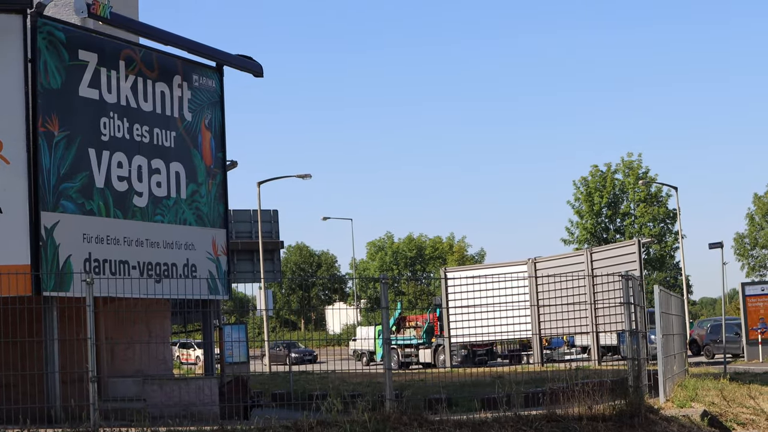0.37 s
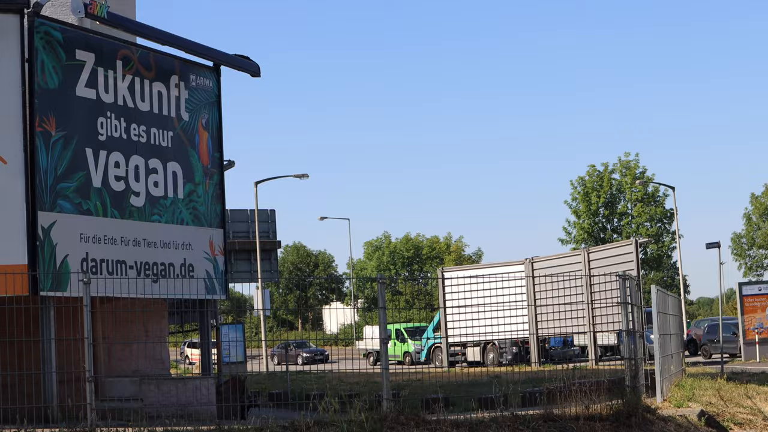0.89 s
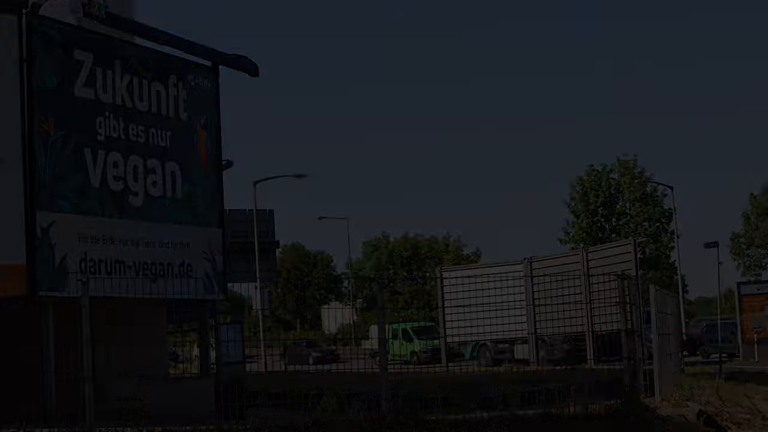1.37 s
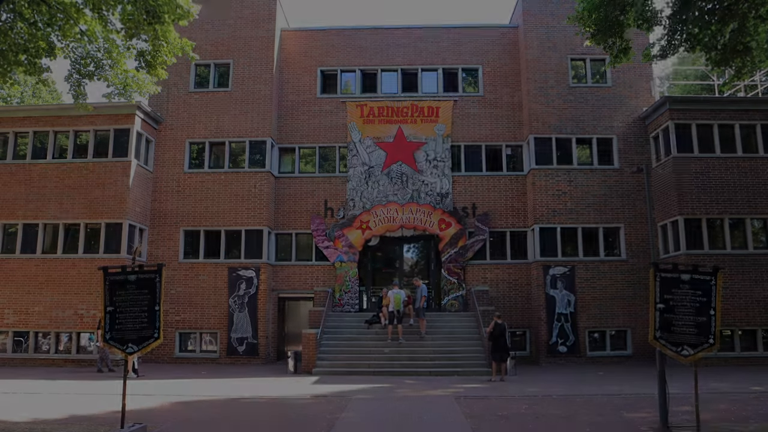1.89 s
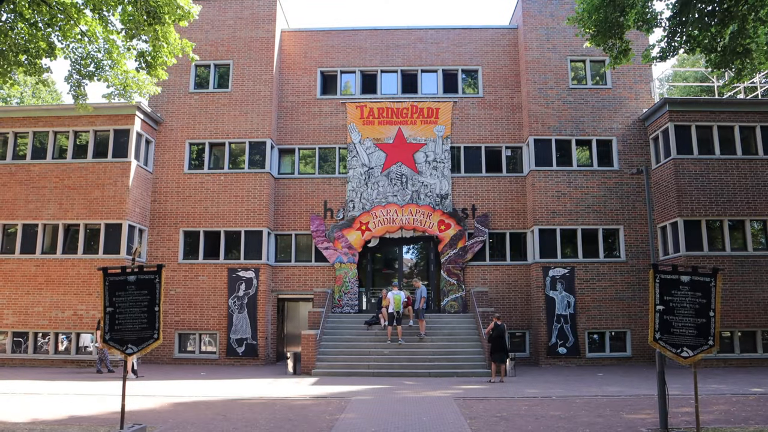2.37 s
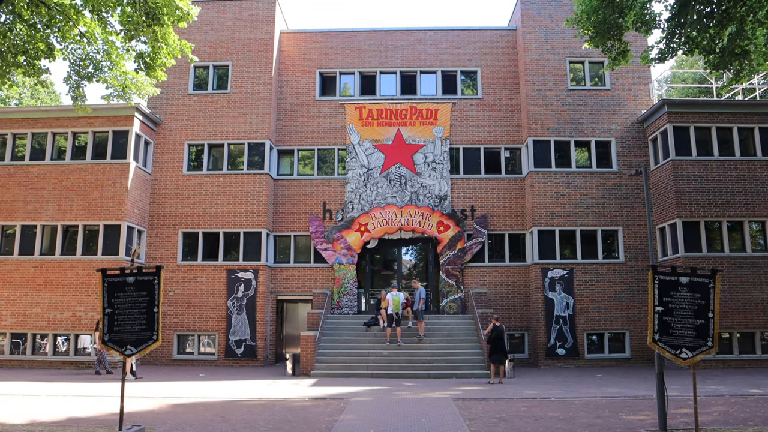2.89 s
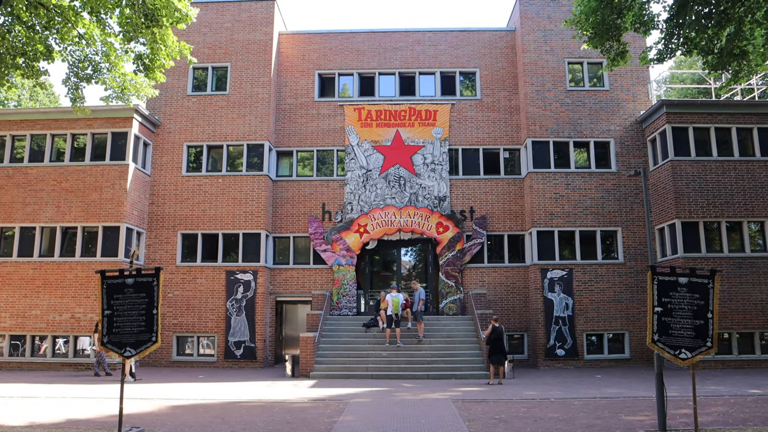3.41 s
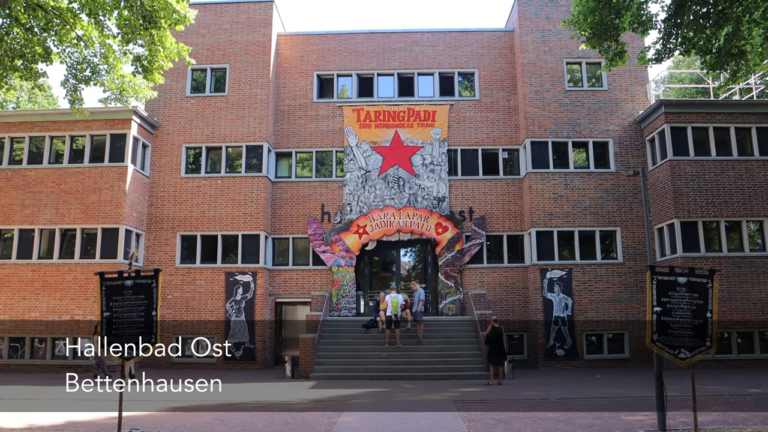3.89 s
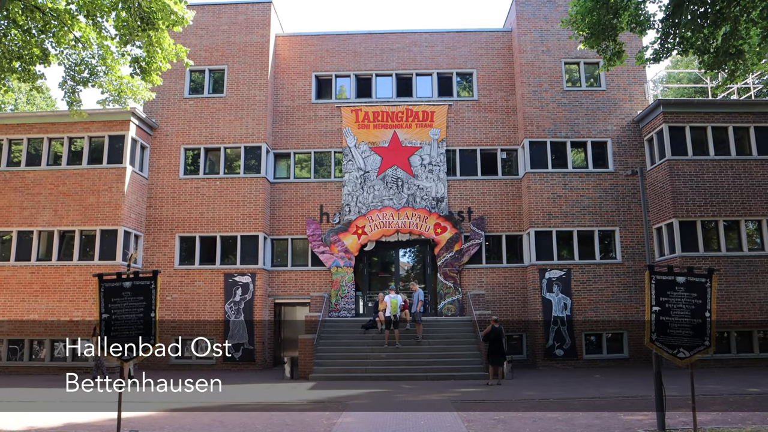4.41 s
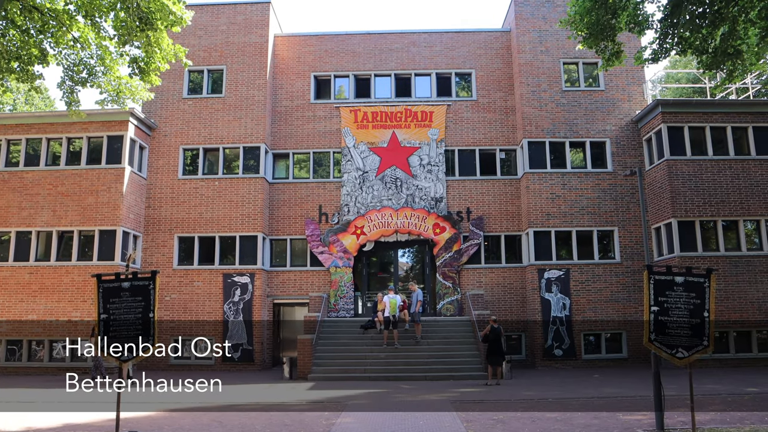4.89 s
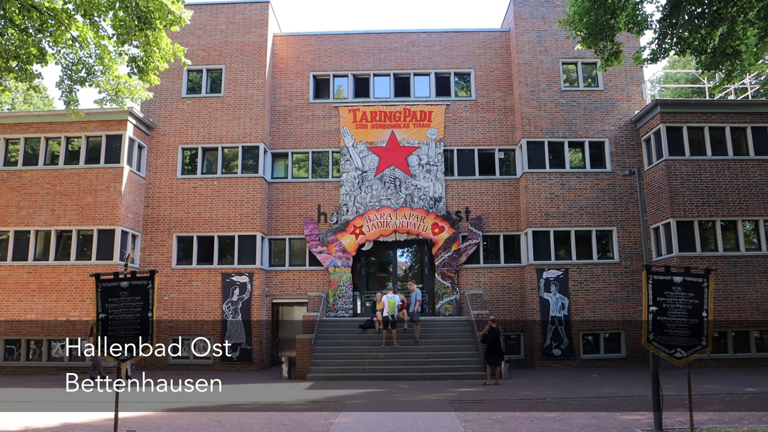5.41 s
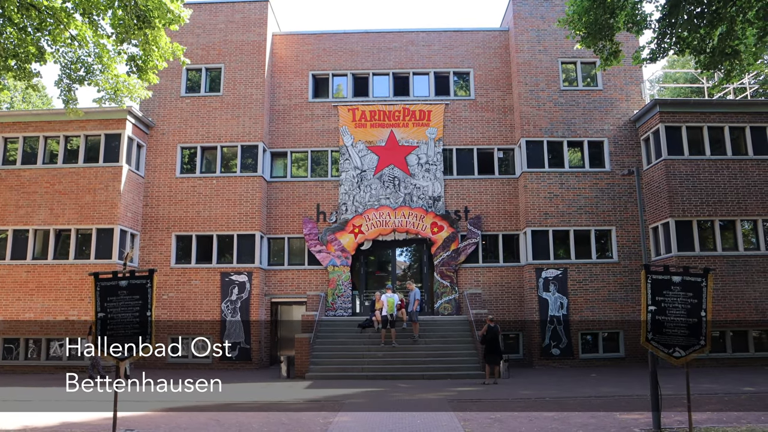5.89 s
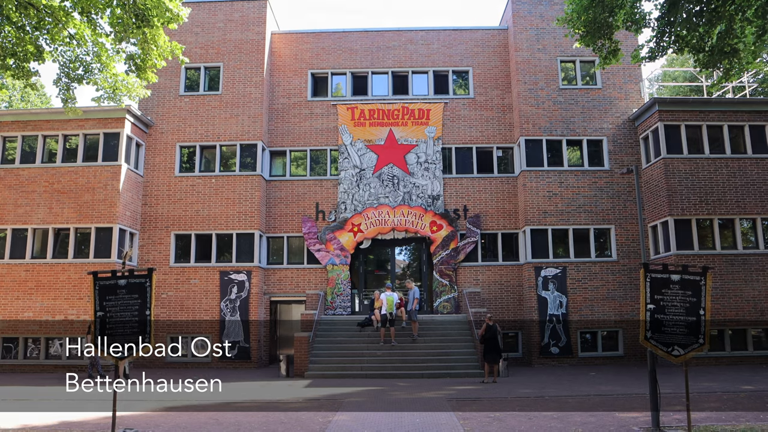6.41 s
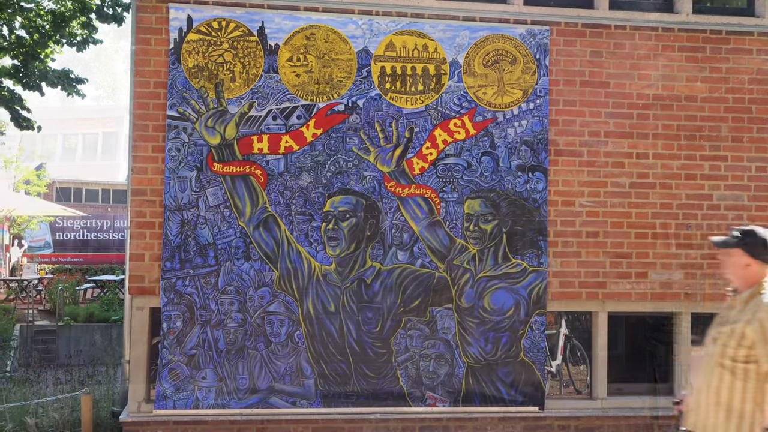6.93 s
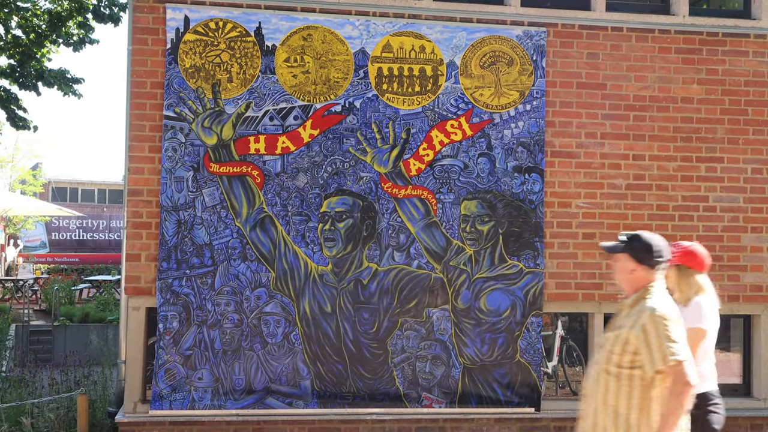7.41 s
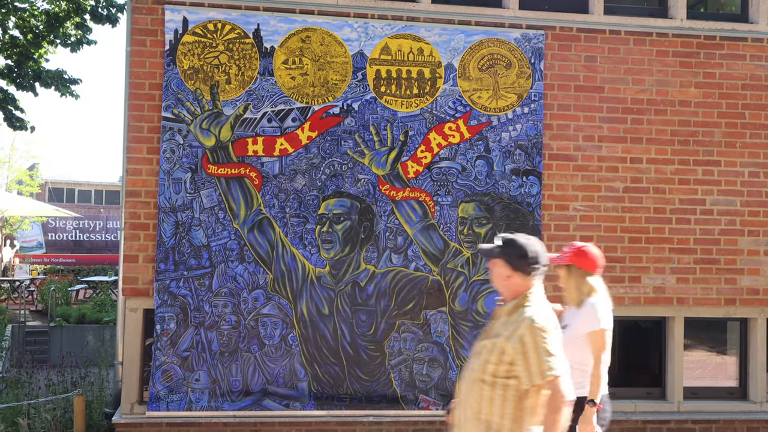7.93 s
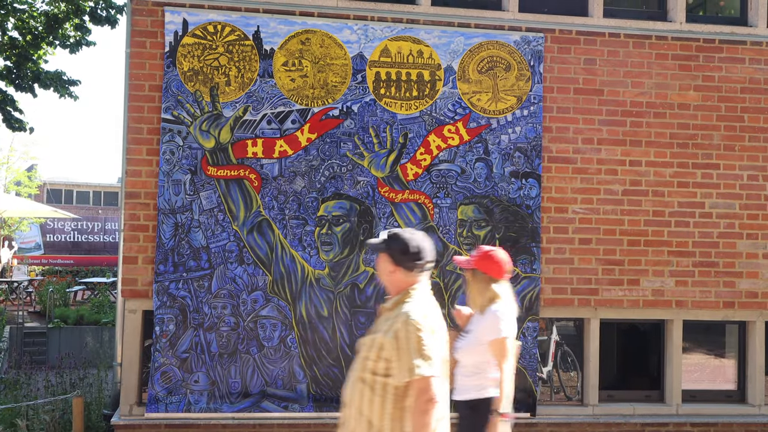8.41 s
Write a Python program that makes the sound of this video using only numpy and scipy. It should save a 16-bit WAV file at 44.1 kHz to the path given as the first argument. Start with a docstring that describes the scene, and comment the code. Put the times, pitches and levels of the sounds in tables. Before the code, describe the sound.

Outdoors, a small stereo camera hears dense traffic roaring on a busy road, a lorry's low drone wavering past slightly to the right. After about a second and a half it fades into a quieter square, where soft traffic rumble carries a deep, uneven diesel throb. Near the end it blends into a street corner with fuller traffic hum, a small click and faint buzzy bird trills on the right.

```python
"""Road traffic, the blurred roar and hiss of many vehicles, in three outdoor places joined by cross-fades.
A busy road with a lorry comes first, then a square with a deep engine throb, then a street corner with a bird.
The traffic is noise shaped in pitch and level; the engines, whines, trills and ticks are sines with moving
pitch or level. A small camera hears it all through two close microphone ports, left and right."""
import sys
import numpy as np
from scipy import signal
from scipy.fft import rfft, irfft, next_fast_len
from scipy.io import wavfile
from scipy.ndimage import uniform_filter1d

SR = 44100
rng = np.random.default_rng(int(sys.argv[2]) if len(sys.argv) > 2 else 0)


def int16_out(signal):
    """Quantize to a 16-bit WAV file."""
    q = np.round(np.clip(np.atleast_2d(signal).T, -1, 1) * 32767)
    wavfile.write(sys.argv[1], SR, q.astype(np.int16))


def voltage_ratio(decibels):
    """Convert decibels (scalar or array-like) to amplitude ratios, 20 dB per decade."""
    exponent = np.asarray(decibels, float) / 20
    return 10 ** exponent


N = 376610  # length in samples
SECONDS = np.arange(N) / SR


def on_log(hz, table):
    """Read a (pitch_hz, value) table, with pitch on a log scale as the ear hears it."""
    points, values = np.transpose(table)
    return np.interp(np.log(np.maximum(hz, 1)), np.log(points), values)


def walk(rate, size):
    """Random wandering: levels held for 1 / rate seconds, smoothed twice, with a spread near 1."""
    hold = int(SR / rate)
    steps = np.repeat(rng.standard_normal(size // hold + 1), hold)
    smooth = uniform_filter1d(uniform_filter1d(steps, hold), hold)
    return 1.29 * smooth[:size]


def gate(start, end, edge):
    """A window in time that opens and closes softly."""
    from_edge = np.minimum(SECONDS - start, end - SECONDS)
    return np.sin(np.pi / 2 * np.clip(from_edge / edge + .5, 0, 1)) ** 2


def note(hz, drift, waver_db, rate):
    """A sine of rms 1, before its level wavers; its pitch wanders too."""
    phase = 2 * np.pi * np.cumsum(hz * (1 + drift * walk(rate, N))) / SR
    level = np.sqrt(2) * voltage_ratio(waver_db * walk(rate, N))
    return level * np.sin(phase + 2 * np.pi * rng.random())


def bump(t, peak_s, length_s):
    """A smooth rise and fall over time, 1 at its peak."""
    return np.exp(-(2 * (t - peak_s) / length_s) ** 2)


def left_right(mid, side):
    """Two ports from their shared sound (mid) and their difference (side)."""
    return np.array([mid + side, mid - side])


# colour of the traffic in each place: pitch_hz, relative level_db per Hz
ROAD_COLOUR = [(20, -35.5), (40, -18.5), (85, -2.5), (170, -1.5), (270, 0), (400, -5), (600, -9.5),
               (900, -11), (1900, -22), (3400, -31.5), (4600, -40), (6500, -52.5), (9000, -73),
               (12500, -84), (15000, -108)]
SQUARE_COLOUR = [(15, -23), (28, -7.5), (60, -1.5), (170, -9), (280, -12.5), (420, -17.5), (830, -20.5),
                 (1800, -28.5), (3300, -40.5), (4600, -50.5), (6500, -62.5), (9000, -68.5), (12500, -80),
                 (15000, -109)]
CORNER_COLOUR = [(20, -33.5), (45, -14), (110, -.5), (235, -3.5), (350, -6), (520, -10), (950, -10),
                 (1900, -17.5), (3400, -27), (4900, -39.5), (6100, -45), (7000, -56), (9000, -75),
                 (12500, -94), (15000, -119)]
# each place, one row: level_db before its changes, extra_width_db, lean_right (share, minus = left),
# left_late (share, minus = right port late), nearer_db_per_s (minus = moving away)
ROAD_SETTING = (-22.5, -1.5, 0.65, 0.19, -1.5)
SQUARE_SETTING = (-28.5, 0.5, -0.17, -0.4, -0.4)
CORNER_SETTING = (-28, -.5, 0.35, 0.47, 0)
# close ports hear the bass alike and the treble opposed: pitch_hz, side_minus_mid_db
PORT_WIDTH = [(30, -42), (100, -28), (250, -18), (630, -8), (1600, -1), (4100, 5.5), (6500, 8), (9000, 7),
              (14000, 4)]
# brief swells and dips of the traffic roar around a centre pitch:
# peak_s, length_s, change_db (minus = dip), centre_hz
ROAR_SWELLS = [(.0, 0.25, 3, 3020), (0.798, .15, 2, 4000), (0.887, 0.38, 2.5, 900), (1.5, 0.28, 2.5, 600),
               (1.89, .4, 2, 302), (3.5, 1, 1, 4200), (4.15, 0.5, 2.5, 169), (5.85, 0.74, -0.7, 170),
               (7.6, 0.7, 0.5, 6000)]
# the roar's upper bands jump briefly, one row: peak_s, length_s, rise_db
ROAR_JUMP = (.243, .07, 5.5)


def traffic(start, end, colour, place, flicker_db):
    """Many vehicles blur into noise; its octave bands share slow drift but flicker apart."""
    level_db, width_db, lean, late, nearer_db = place
    first, size = int(start * SR), next_fast_len(int((end - start) * SR))
    hz = np.arange(size // 2 + 1) * SR / size
    mid, other = rfft(rng.standard_normal((2, size)))

    # traffic off to one side ties the difference to the sum: weaker and later at the far port
    tie = -(lean / np.sqrt(1 + (hz / 2200) ** 2) + 1j * late)
    side = tie * mid + np.sqrt(np.maximum(1 - abs(tie) ** 2, 0)) * other
    side = side * voltage_ratio(on_log(hz, PORT_WIDTH) + width_db)
    pair = np.array([mid, side]) * voltage_ratio(on_log(hz, colour))
    pair = pair * voltage_ratio(level_db) / np.std(irfft(pair[0], size))

    t = (first + np.arange(size)) / SR
    approach = nearer_db * (t - (start + end) / 2)
    swells = [(change_db * bump(t, peak_s, length_s), centre_hz)
              for peak_s, length_s, change_db, centre_hz in ROAR_SWELLS]
    peak_s, length_s, rise_db = ROAR_JUMP
    jump = rise_db * bump(t, peak_s, length_s)
    spread_octaves = 1.6  # how far a swell or dip reaches around its centre pitch
    bands = 0
    for band_hz in 170 * 2. ** np.arange(-3, 8):
        # neighbouring bands overlap as triangles one octave to each side
        share = np.clip(1 - np.abs(np.log2(np.maximum(hz, 1) / band_hz)), 0, 1)
        swelling = sum(swell * np.exp(-(np.log2(band_hz / centre_hz) / spread_octaves) ** 2)
                       for swell, centre_hz in swells)
        change_db = approach + swelling + jump * (band_hz > 300) + flicker_db * walk(6, size)
        bands = bands + voltage_ratio(change_db) * irfft(pair * share, size)
    out = np.zeros((2, N + size))
    out[:, first:first + size] = left_right(*bands)
    return out[:, :N]


# lorry drone by the road, before it wavers: time_s, pitch_hz, level_db
LORRY_DRONE = [(0, 279, -29), (.2, 272, -45), (.35, 262, -43), (.47, 260, -27.5), (.7, 258, -36.5),
               (.8, 265, -34), (1.15, 265, -28.5), (1.55, 264, -33)]


def lorry():
    """The exhaust of a lorry pulling past: one note that glides and wavers, slightly to the right."""
    time_s, pitch_hz, level_db = np.transpose(LORRY_DRONE)
    tone = note(np.interp(SECONDS, time_s, pitch_hz), drift=.014, waver_db=3.5, rate=16)
    tone = voltage_ratio(np.interp(SECONDS, time_s, level_db)) * tone
    return left_right(tone, -.07 * tone)


# heavy engine across the square, before it wavers: time_s, firing_hz, level_db
ENGINE_THROB = [(1.5, 52.15, -40), (1.72, 48.3, -26), (1.88, 50, -39), (2.04, 57.41, -29), (2.2, 47.8, -47),
                (2.46, 48.16, -26.5), (2.6, 52.76, -31), (2.87, 54.44, -29), (3.24, 52.8, -29),
                (3.4, 45.84, -31), (4.18, 45.13, -27.5), (4.6, 49.16, -43), (5.15, 56.6, -31.5),
                (5.33, 47.03, -32.5), (5.77, 47.3, -31), (6.1, 54.97, -32.5), (6.4, 48.75, -30),
                (6.9, 51.46, -30)]
# its firing note and overtones: multiple of the firing rate, relative level_db
ENGINE_OVERTONES = [(1, -1.5), (2, -11.5), (3, -15.5), (4, -17)]


def throb():
    """A slow diesel far off: the firing note and its first overtones, each wavering on the way."""
    time_s, firing_hz, level_db = np.transpose(ENGINE_THROB)
    pitch_hz = np.interp(SECONDS, time_s, firing_hz) * (1 + .04 * walk(12, N))
    phase = 2 * np.pi * np.cumsum(pitch_hz) / SR
    tones = sum(voltage_ratio(overtone_db + 1.9 * walk(11, N)) * np.sin(multiple * phase)
                for multiple, overtone_db in ENGINE_OVERTONES)
    return np.sqrt(2) * voltage_ratio(np.interp(SECONDS, time_s, level_db)) * tones


# notes of engines, gears and brakes, before they waver: start_s, end_s, pitch_hz, level_db
STEADY_NOTES = [(0.01, 0.146, 102, -32), (0.07, 0.18, 170.5, -28.5), (.85, 1.2, 205, -31),
                (2.95, 3.85, 2785, -60.5), (3.23, 3.7, 2842, -62), (4.3, 5.006, 503.4, -49.5),
                (3.6, 6.6, 330.5, -46.5), (4.999, 5.8, 3870, -70), (7.2, 8.202, 354.8, -41.5),
                (7.61, 7.72, 746, -40), (7.692, 8.5, 231.3, -41)]


def whines():
    """Engines, gears and brakes: nearly steady notes that come and go, off to the right."""
    out = 0
    for start_s, end_s, pitch_hz, level_db in STEADY_NOTES:
        drift = 5 / pitch_hz + .001  # wander of about 5 Hz plus 0.1 % of the pitch
        tone = note(pitch_hz, drift, waver_db=3, rate=12)
        tone = voltage_ratio(level_db) * gate(start_s, end_s, .08) * tone
        out = out + left_right(tone, -voltage_ratio(on_log(pitch_hz, PORT_WIDTH)) * tone)
    return out


# buzzy trills, levels before the buzz and waver: start_s, end_s, first_pitch_hz, level_db
BIRD_TRILLS = [(7.14, 7.27, 7700, -77), (7.23, 7.39, 5800, -66), (8.14, 8.39, 6900, -66.5)]


def bird():
    """A whistle swept up and down so fast that it buzzes, blurred by echoes off the house walls."""
    sag_hz_per_s, sweep_hz, sweeps_per_s = 600, 320, 93
    out = 0
    for start_s, end_s, first_hz, level_db in BIRD_TRILLS:
        beat = 2 * np.pi * np.cumsum(sweeps_per_s * (1 + .22 * walk(60, N))) / SR
        sag_hz = sag_hz_per_s * np.clip(SECONDS - start_s, 0, end_s - start_s)
        whistle = note(first_hz - sag_hz + sweep_hz * np.sin(beat), drift=.007, waver_db=2.5, rate=40)
        buzz = 1 + .8 * np.sin(2 * beat + 1.5)  # loudness pulses twice per sweep
        out = out + voltage_ratio(level_db) * gate(start_s, end_s, .04) * buzz * whistle
    t = np.arange(SR // 5) / SR
    echoes = rng.standard_normal((2, len(t))) * np.exp(-t / 0.022) * voltage_ratio(-27.5)
    wet = signal.fftconvolve(out[None], echoes, axes=1)[:, :N]
    return left_right(out + wet[0], -1.8 * (out + wet[1]))


# faint ticks in the treble: start_s, peak level_db of the envelope, pitch_hz
TREBLE_TICKS = [(.0892, -46, 11000), (.1306, -56, 12000), (.2554, -54, 12000), (.2598, -48, 12000),
                (.8235, -47, 11000), (.8594, -53, 11000), (1.0645, -58, 12000), (1.5618, -52, 12000),
                (1.5993, -56, 12000), (7.0918, -43, 7500), (7.0926, -35, 4500), (7.1, -47, 6000)]
# how far ticks sit to the right, one row: side_share before the corner, side_share at the corner
TICK_LEAN = (.12, 1.6)


def ticks():
    """Clicks of a cycle or two; higher ones die sooner."""
    out, t = np.zeros((2, N)), np.arange(96) / SR
    for start_s, level_db, pitch_hz in TREBLE_TICKS:
        envelope = np.e * t * pitch_hz * np.exp(-t * pitch_hz)
        click = voltage_ratio(level_db) * envelope * np.sin(2 * np.pi * pitch_hz * t)
        at_corner = int(start_s > PLACE_FADES[1][0])
        first = int(start_s * SR)
        out[:, first:first + len(t)] += left_right(click, -TICK_LEAN[at_corner] * click)
    return out


# cross-fades, road to square and square to corner: start_s, end_s
PLACE_FADES = [(1.3, 1.905), (6.6, 6.857)]


def scene():
    """The three places fade one into the next; whines, bird and ticks are laid on top."""
    to_square, to_corner = (np.clip((SECONDS - start_s) / (end_s - start_s), 0, 1)
                            for start_s, end_s in PLACE_FADES)
    road = traffic(0, 2, ROAD_COLOUR, ROAD_SETTING, flicker_db=.8) + lorry()
    square = traffic(1, 7.2, SQUARE_COLOUR, SQUARE_SETTING, flicker_db=.6) + throb()
    corner = traffic(6.3, 8.6, CORNER_COLOUR, CORNER_SETTING, flicker_db=.6)
    places = (1 - to_square) * road + to_square * (1 - to_corner) * square + to_corner * corner
    return places + whines() + bird() + ticks()


def roll_off(x):
    """The treble ends steeply here."""
    return signal.sosfilt(signal.butter(12, 15700, fs=SR, output="sos"), x)


# echo off the camera body, one row: delay_s, level_db
CAMERA_ECHO = (.00094, -20)


def record(dry):
    """A short echo off the camera body ripples the colour of the sound."""
    delay_s, level_db = CAMERA_ECHO
    lag = int(delay_s * SR)
    echo = np.pad(dry, ((0, 0), (lag, 0)))[:, :N]
    heard = dry + voltage_ratio(level_db) * echo
    return roll_off(heard)


dry = scene()
out = record(dry)
int16_out(out)
```